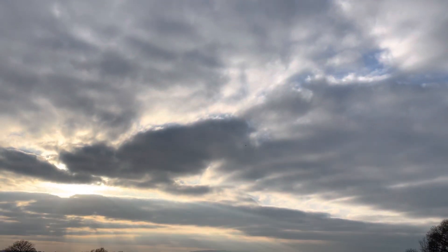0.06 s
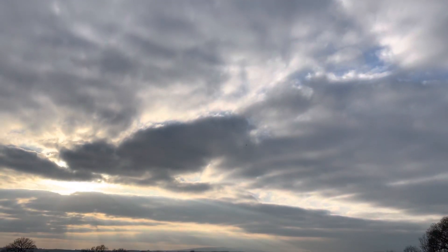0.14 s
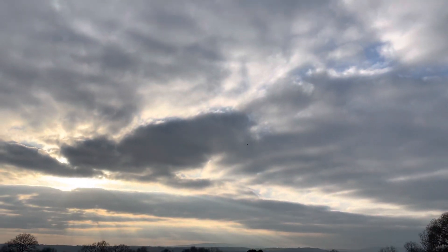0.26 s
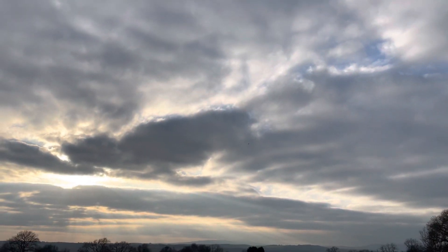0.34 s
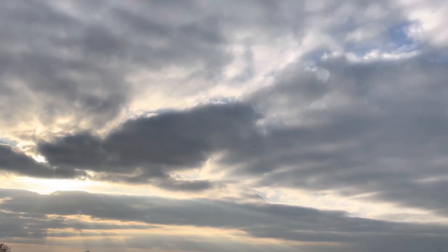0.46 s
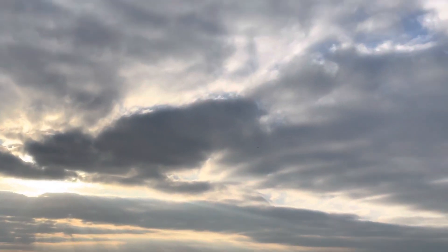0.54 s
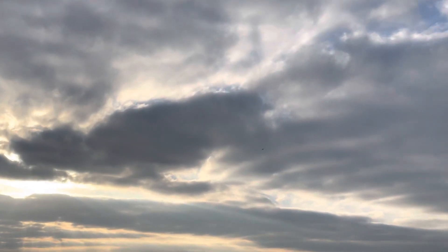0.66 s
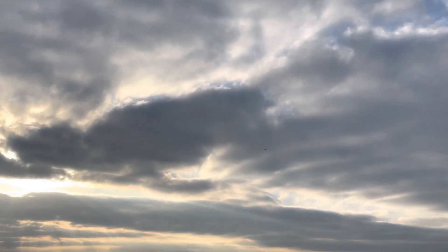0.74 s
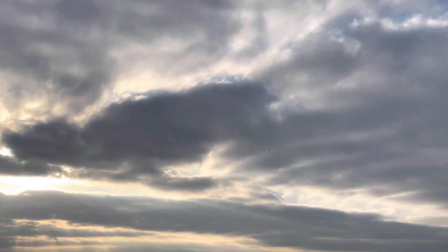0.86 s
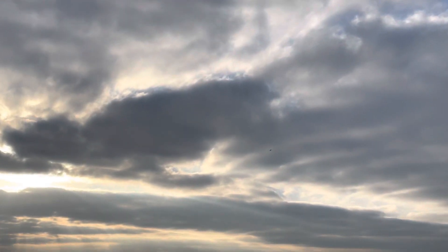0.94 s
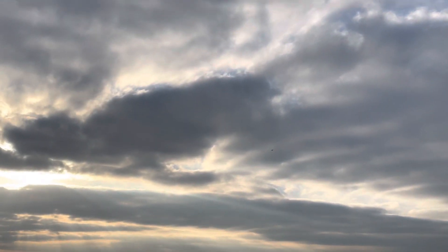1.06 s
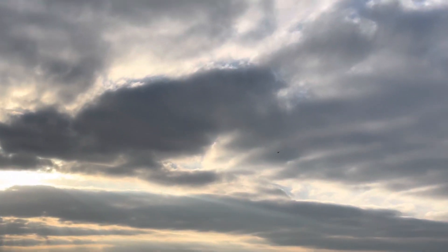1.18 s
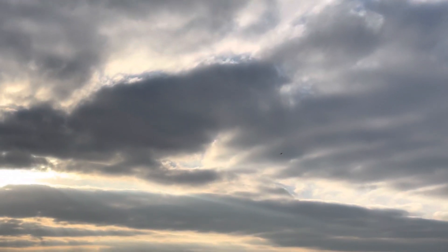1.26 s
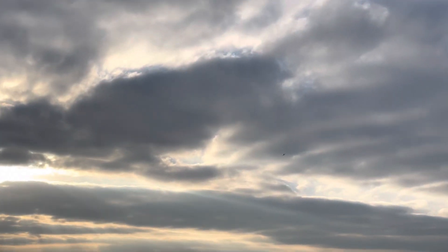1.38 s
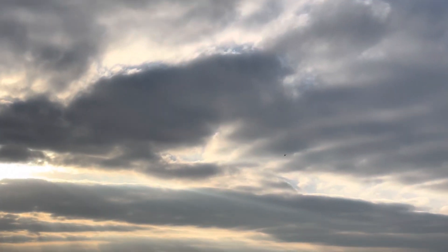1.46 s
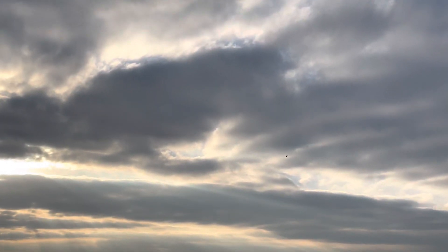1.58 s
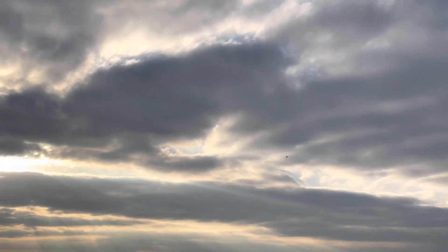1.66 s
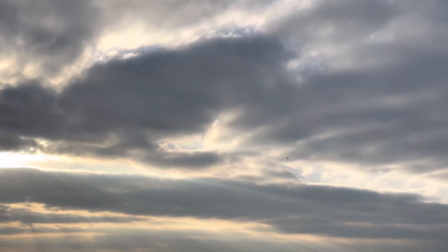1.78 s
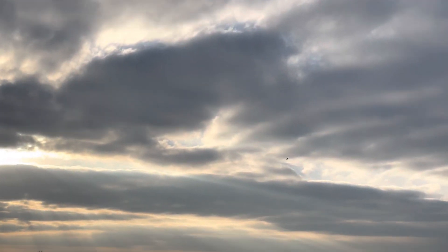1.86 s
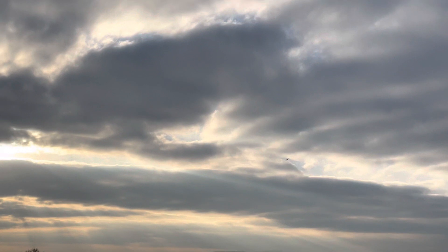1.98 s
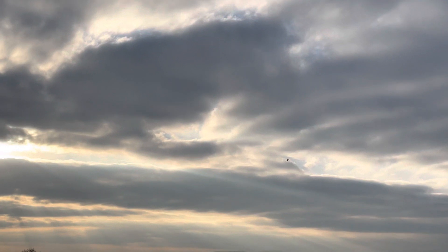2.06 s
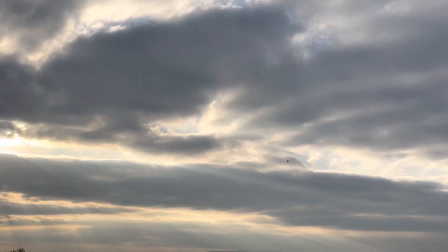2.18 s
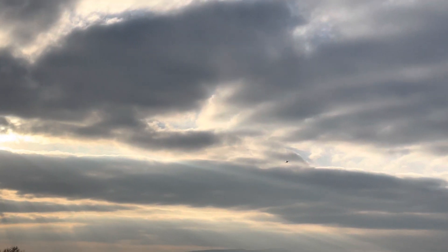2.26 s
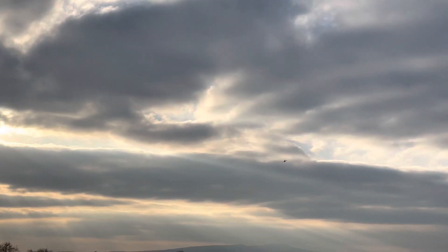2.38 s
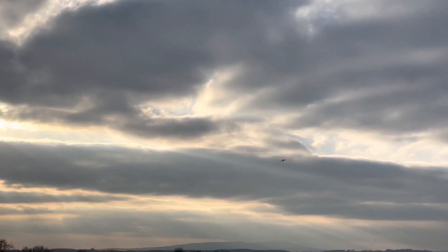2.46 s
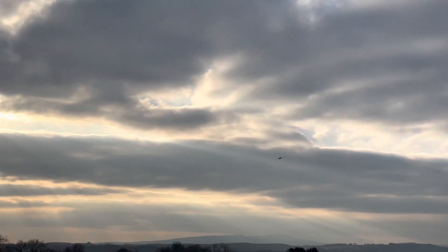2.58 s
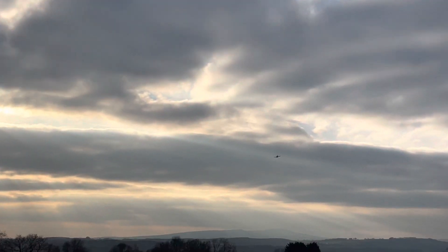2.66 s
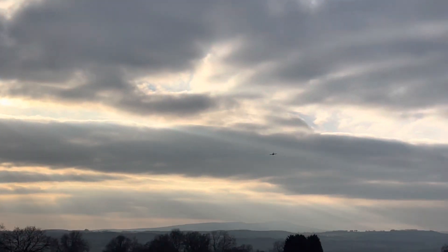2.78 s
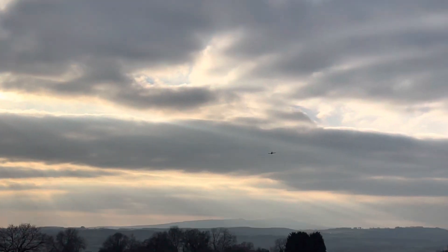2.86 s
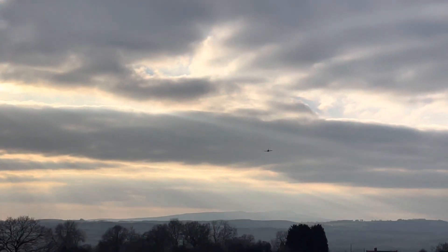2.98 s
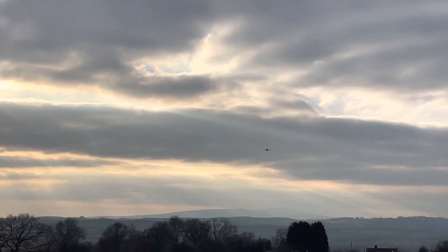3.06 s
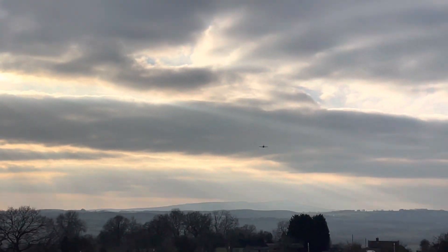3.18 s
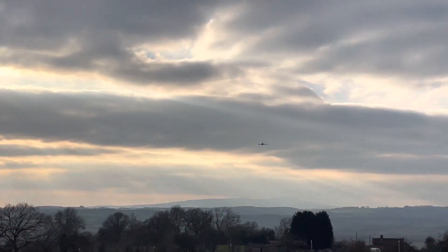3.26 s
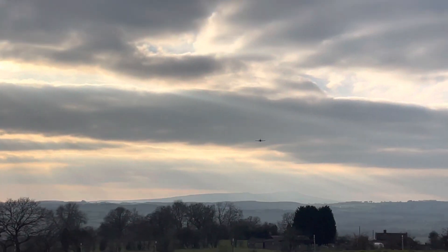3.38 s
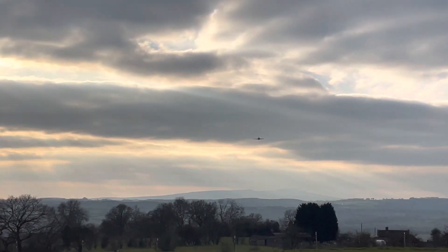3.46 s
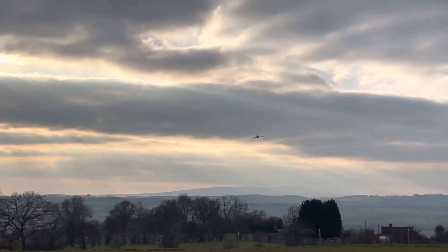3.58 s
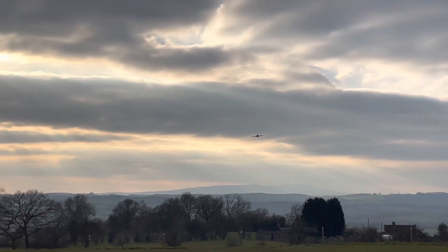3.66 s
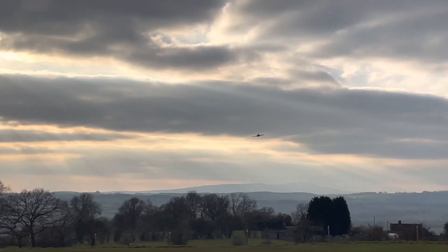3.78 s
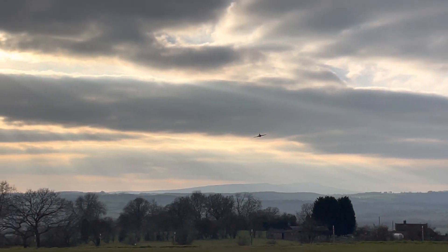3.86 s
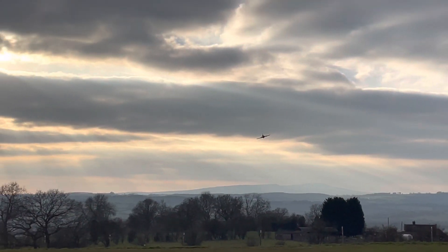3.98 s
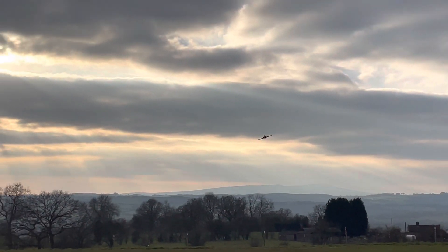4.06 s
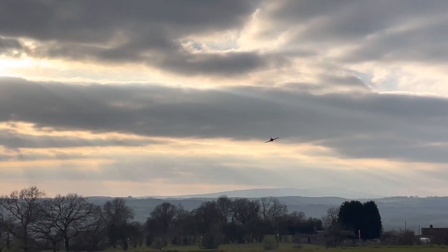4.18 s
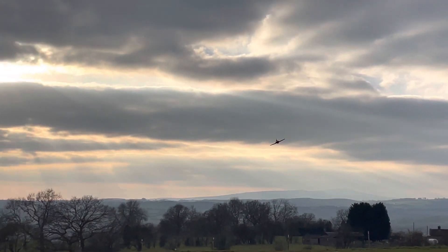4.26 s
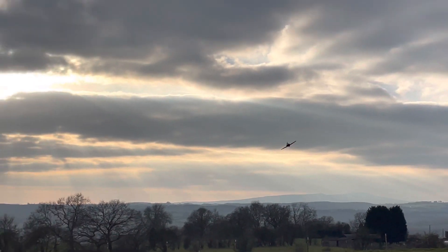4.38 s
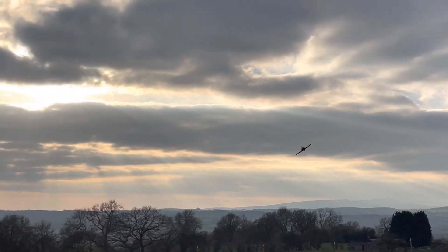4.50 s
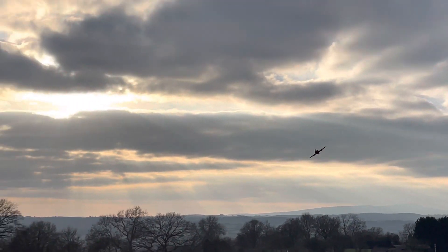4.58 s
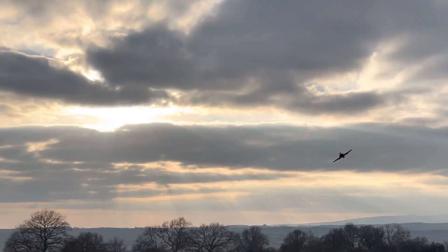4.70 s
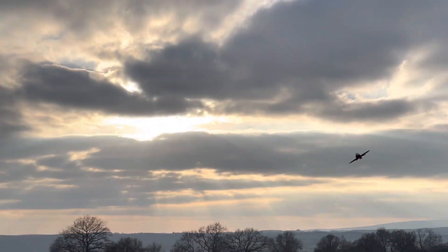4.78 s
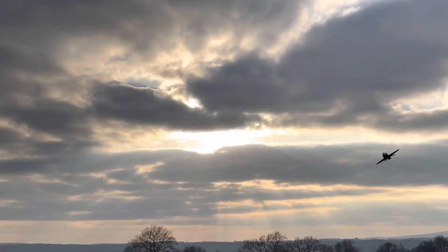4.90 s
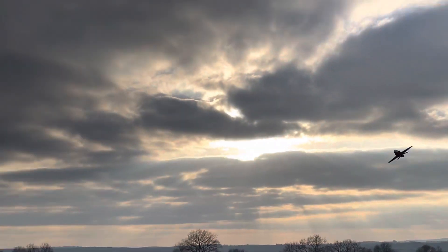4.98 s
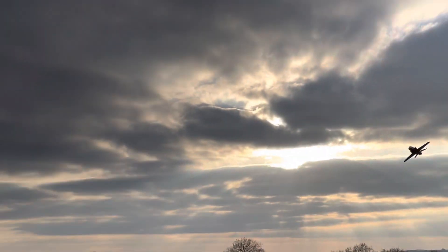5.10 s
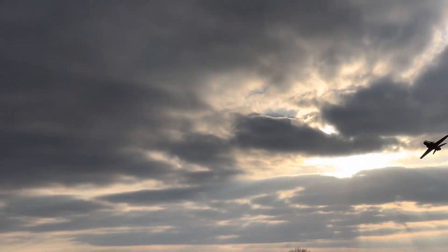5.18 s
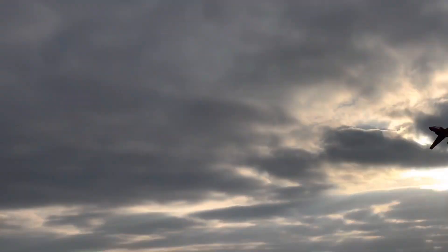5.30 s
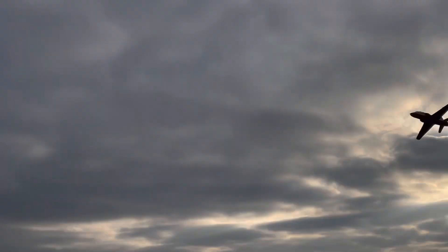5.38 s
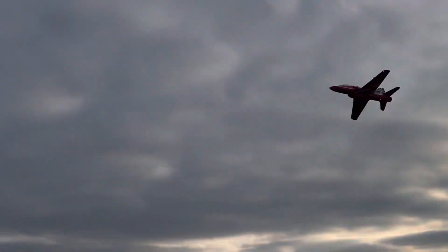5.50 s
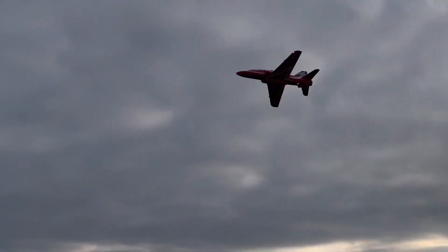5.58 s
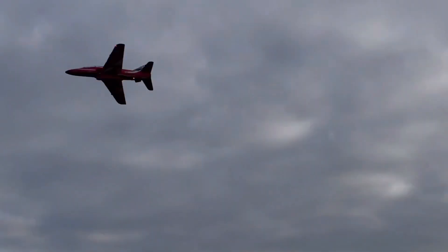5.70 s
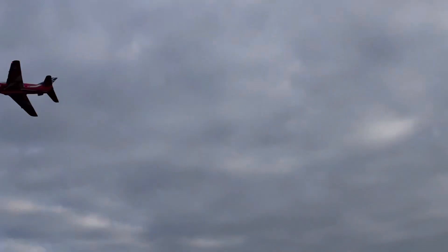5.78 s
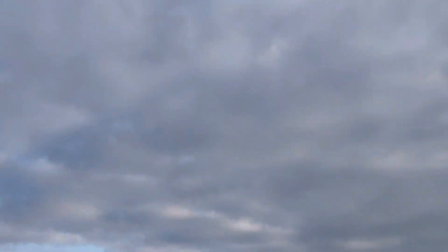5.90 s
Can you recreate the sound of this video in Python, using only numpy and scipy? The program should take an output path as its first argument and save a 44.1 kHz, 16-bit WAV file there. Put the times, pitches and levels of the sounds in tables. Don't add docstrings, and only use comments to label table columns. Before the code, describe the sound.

In a quiet open grass field, a handheld stereo microphone picks up a distant electric ducted-fan model jet. At first it is a thin, wavering whine and faint hiss, with soft wind rumble and tiny low pops on the microphone. Around 1 second the throttle opens and the whine jumps up in pitch, then holds nearly steady, shimmering as moving air brightens and dulls it. From 2 to 4 seconds the hiss gradually gains body, a hollow comb-like colour sliding through it from the grass reflection, while gusts thud lightly. From about 4.5 seconds it grows quickly into a broad, rushing roar with bright airy highs. At about 5.5 seconds it sweeps close past, its whine dropping in pitch, a low shaft hum surfacing briefly. At 5.6 seconds its wake hits the microphone with a heavy flutter and rumble, easing as the stretch ends, the jet still loud.

```python
import sys
import numpy as np
from scipy import signal
from scipy.fft import rfft, irfft, next_fast_len
from scipy.io import wavfile
from scipy.ndimage import uniform_filter1d, map_coordinates

SR = 44100
rng = np.random.default_rng(int(sys.argv[2]) if len(sys.argv) > 2 else 0)


def ratio_of_db(decibels):
    return 10 ** (np.asarray(decibels, float) / 20)


def file_out(sig):
    cols = np.atleast_2d(sig).T
    lim = np.clip(cols, -1, 1)
    pcm = np.round(lim * 32767).astype(np.int16)
    wavfile.write(sys.argv[1], SR, pcm)


N = 261777
T = np.arange(N) / SR
SIZE = next_fast_len(N)
HZ = np.maximum(np.arange(SIZE // 2 + 1) * SR / SIZE, 1)

# (time [s], distance [m], fan power towards the listener at 10 m [dB])
FLIGHT = [(0, 400, -46), (.22, 370, -34.5), (.6, 390, -32), (1.0, 207, -35.5), (1.3, 218, -31.5),
          (1.9, 132, -37.5), (2.3, 203, -28), (2.7, 96, -35.5), (3.05, 87, -40), (3.3, 103, -35),
          (3.5, 49.8, -38.5), (4.0, 27.9, -43.5), (4.6, 24.2, -37.5), (5.0, 21.8, -33.5), (5.3, 15.4, -32),
          (5.55, 10.9, -31), (5.72, 10.7, -32.5), (5.94, 8.1, -38.5)]
POCKET_ROAR, POCKET_MID, POCKET_TOP = 0.06, 0.41, 0.4
BLADES = 12


def rms_one(x):
    return x / np.sqrt(np.mean(x ** 2) + 1e-30)


def in_time(rows):
    s, *columns = np.transpose(rows)
    return [np.interp(T, s, c) for c in columns]


def on_grid(points):
    hz, value = np.transpose(points)
    return np.interp(np.log(HZ), np.log(hz), value)


def shaped(x, gain):
    return irfft(rfft(x, SIZE) * gain, SIZE)[..., :N]


def drift(rate_hz):
    r = np.exp(-2 * np.pi * rate_hz / SR)
    return rms_one(signal.lfilter([1], [1, -2 * r, r * r], rng.standard_normal(N + SR))[SR:])


def rising(at_s, span_s):
    return 1 / (1 + np.exp((at_s - T) / span_s))


def wavering(turn, width_hz):
    return drift(width_hz) * np.sin(turn) + drift(width_hz) * np.cos(turn)


def evened(x, window_s):
    power = uniform_filter1d(x ** 2, size=int(window_s * SR))
    return rms_one(x / np.sqrt(power + 1e-9) ** .65)


def heard(hz, pocket_share):
    # (time [s], gain at 5 kHz [dB], half length [s])
    pockets = [(0.425, 17, 0.15), (1.3, 7, 0.38), (1.537, 3.5, 0.051), (1.794, 3, .07), (2.05, 5.5, 0.087),
               (2.207, 5, 0.094), (2.509, 12, 0.13), (2.778, 2, 0.034), (3.052, 10, 0.24),
               (3.485, 4, 0.049), (3.6, 4, .06), (3.942, 1.5, 0.1), (4.08, 5, 0.13), (4.67, 4, 0.13),
               (4.946, 3, 0.036), (5.115, 3.5, 0.025), (5.45, 1, 0.041)]
    metres, power_db = in_time(FLIGHT)
    t = np.arange(0, N + 64, 64) / SR
    coarse_db = sum(db * np.exp(-((t - s) / half) ** 2) for s, db, half in pockets)
    pockets_db = np.interp(T, t, coarse_db)
    spreading_db = 20 * np.log10(metres / 10)
    air_db = 0.4423 * (hz / 11170.0) ** 2.02 * metres
    return power_db - spreading_db - air_db + pocket_share * pockets_db


def hiss():
    # (frequency [Hz], density [dB per Hz])
    hiss_colour = [(90, -12), (200, -13), (320, -1.5), (520, -1), (900, 3.5), (1760, 1), (1880, -8),
                   (2600, -10), (3600, -8.5), (5200, -17.5), (6500, -13.5), (8000, -12), (10000, -16),
                   (12500, -25.5), (14200, -25), (15800, -30)]
    # (low edge [Hz], high edge [Hz])
    ranges_hz = [(520, 1800), (1900, 3600), (3600, 6500), (9300, 12000)]
    colour = ratio_of_db(on_grid(hiss_colour))
    white = rfft(rng.standard_normal((2, SIZE))) * colour
    power = [2 / SIZE * np.sum(colour[(HZ > low) & (HZ < high)] ** 2) for low, high in ranges_hz]

    idle_db = -15 * (1 - rising(1, 0.099))
    shade_db = -1.5 * rising(4.6, 0.31)
    levels = [heard(1000, POCKET_ROAR),
              -6 + heard(2930, POCKET_MID),
              -4 + shade_db + idle_db + heard(3670, 1),
              -4 + heard(10500, POCKET_TOP)]
    roar, mid, blade, top = np.array(levels) - 10 * np.log10(power)[:, None]
    top = top + 0.067 * (top - top.max())
    shoulder = blade + 1.5 + heard(9700, .9) - heard(5300, 0.83)
    edge = top + 0.23 * (top - blade) + 0.21 * (top - top.max())
    exhaust = roar + 0.32 * (roar - np.median(roar))

    knots_hz = np.array([330, 560, 1720, 1950, 3900, 5300, 7700, 10500, 14000])
    gains_db = [exhaust, roar, roar, mid, mid, blade, shoulder, top, edge]
    path = np.sqrt(np.minimum(in_time(FLIGHT)[0] / 60, 1))
    air, out = drift(3.7), 0
    for k, gain_db in enumerate(gains_db):
        part = np.interp(HZ, knots_hz, np.arange(len(knots_hz)) == k)
        shimmer_db = path * (0.23 + 0.14 * k) * (1.67 * air + 2.7 * drift(2.7))
        out = out + ratio_of_db(gain_db + shimmer_db - 2.5) * irfft(white * part, SIZE)[:, :N]
    return out


def rotor():
    # (time [s], shaft [Hz],
    # unbalance shake over the roar [dB], blade whine over the hiss [dB])
    rotor_course = [(0, 352, -30, -20), (.4, 366, -3, 8), (.87, 372, -4.5, 9), (.95, 386, -3, 4),
                    (1.05, 435.6, -18, 9), (1.15, 448.9, -14, 10), (2.0, 454, -11, 9.5),
                    (2.5, 457, -20.5, 5), (4.5, 454.5, -11, -4), (4.9, 450.5, -9.5, -5.5),
                    (5.1, 447, -4.5, 0), (5.3, 439.8, -6, 4.5), (5.48, 431, -1.5, 1), (5.6, 423, 11, -2),
                    (5.68, 407.5, 6, 0.5), (5.78, 395.4, -4.5, 2), (5.86, 384.6, -5.5, 4.5),
                    (5.94, 382, -13, 2)]
    shaft_hz, shake_db, whine_db = in_time(rotor_course)
    roar_db = heard(1000, POCKET_ROAR)
    band_db = heard(BLADES * shaft_hz, 0.63)
    fade_db = roar_db - roar_db.max()

    first_db = roar_db + shake_db
    abeam_db = 5.5 * np.exp(-((T - 5.42) / 0.11) ** 2)
    twice_db = roar_db - 15.5 + 0.25 * fade_db + abeam_db
    third_db = roar_db - 18.5 - 0.11 * fade_db
    blade_db = band_db - 2 + whine_db + 2.7 * drift(4.1)
    broad_db = band_db - 0.5 + 0.2 * whine_db
    second_db = heard(9300, POCKET_TOP) - 10 + 13.5 * rising(5.71, 0.1)
    third_blade_db = second_db - 14 + heard(36 * shaft_hz, 0) - heard(24 * shaft_hz, 0)

    far = in_time(FLIGHT)[0] / 150
    near_far = np.minimum(far, 1)
    turn = 2 * np.pi * np.cumsum(shaft_hz * (1 + 0.001128 * drift(10.74))) / SR
    blade_turn = BLADES * turn
    tones = ratio_of_db(first_db + 3 + (1.6 + 2.5 * near_far) * drift(25.0)) * np.sin(turn)
    tones += ratio_of_db(twice_db + 4.5) * wavering(2 * turn, 10.0)
    tones += ratio_of_db(third_db + 1.5 + 2.26 * drift(15.0)) * np.sin(3 * turn)
    second = 1.3 * np.sin(2 * blade_turn) + .6 * wavering(2 * blade_turn, 30.)
    tones += ratio_of_db(second_db - 6 + 1.5 * drift(5.0)) * second
    tones += ratio_of_db(third_blade_db) * wavering(3 * blade_turn, 45.)
    tones += ratio_of_db(blade_db - 4.5 - 9 * np.minimum(far, 1.2)) * wavering(blade_turn, 70.)
    humps = ratio_of_db(blade_db - 7 - 3 * near_far) * wavering(blade_turn, 260.)
    humps += ratio_of_db(broad_db - 2) * wavering(12.3 * turn, 1030.0)
    return tones, humps


def ground(x):
    # (time [s], lag behind the direct sound [ms])
    bounce_lag = [(0, 3.8), (.4, 3.03), (.9, 2.97), (1.45, 2.51), (1.8, 2.29), (2.35, 1.78), (2.7, 1.51),
                  (3.55, 1.185), (3.9, 1.15), (4.3, 1.225), (4.7, 1.414), (4.9, 1.77), (5.1, 2.2),
                  (5.3, 2.67), (5.5, 4.7), (5.6, 5.74), (5.8, 5.56), (5.94, 3.8)]
    # (time [s], lows [0-1], highs [0-1])
    mirror = [
        (0, .7, .6),
        (2.5, .7, .55),
        (3.5, .85, .8),
        (4.4, .8, .75),
        (4.8, .9, .5),
        (5.2, .97, .3),
        (5.45, .7, .15),
        (5.94, .55, .15),
    ]
    lag_ms, = in_time(bounce_lag)
    low_share, high_share = np.clip(in_time(mirror), 0, 1)
    soil = np.exp(-.5j) / (1 + 1j * HZ / 30000.) / np.sqrt(1 + (HZ / 13000.) ** 2)
    lows = 1 / (1 + (HZ / 1900.) ** 4)
    bounce = low_share * shaped(x, soil * lows) + high_share * shaped(x, soil * (1 - lows))
    late = np.arange(N) - lag_ms * (1 + 0.0039 * drift(20.0)) * SR / 1000
    return x + np.array([map_coordinates(c, [late], order=3) for c in bounce])


def gusts():
    # (time [s], rumble [dB], rustle [dB], half length [s])
    gust_list = [(0.005, -33, -47.5, 0.016), (0.126, -38.5, -66, 0.046), (0.213, -33, -47.5, 0.021),
                 (0.411, -36, -45, 0.017), (.5, -45.5, -60, 0.15), (0.696, -41.5, -73, 0.042),
                 (1.027, -47.5, -59, 0.067), (1.624, -43.5, -55, 0.12), (1.785, -41.5, -89, 0.062),
                 (2.05, -46.5, -80, 0.082), (2.322, -36.5, -51, 0.041), (2.394, -32, -39.5, 0.013),
                 (2.45, -32, -56, 0.021), (2.568, -47, -50, 0.027), (2.753, -46, -59, .06),
                 (2.932, -40.5, -52, 0.059), (3.084, -32, -62, 0.031), (3.221, -39.5, -51, 0.037),
                 (3.443, -43, -55, 0.022), (3.604, -36.5, -67, 0.018), (3.772, -40, -54.5, 0.09),
                 (4.078, -33, -46.5, 0.037), (4.163, -33.5, -53, 0.033), (4.244, -33.5, -41.5, 0.022),
                 (4.374, -40, -45.5, 0.074), (4.55, -45, -47.5, 0.13), (4.768, -42.5, -44, 0.067),
                 (4.843, -35, -48, 0.038), (4.96, -28.5, -37, 0.0075), (5.049, -35, -53, 0.049)]
    # (time [s], rumble [dB], rustle [dB], half length [s])
    wake = [
        (5.557, -39, -43, 0.053),
        (5.618, -17.5, -18.5, 0.021),
        (5.652, -25, -21, 0.02),
        (5.703, -25, -34, 0.026),
        (5.77, -30.5, -27, 0.043),
        (5.84, -37.5, -44, 0.046),
    ]
    power = ratio_of_db(2 * np.array([[-51.5], [-60.5]]))
    for s, rumble_db, rustle_db, half in gust_list + wake:
        shape = np.cosh(np.clip(1.53 * (T - s) / half, -30, 30)) ** -2
        power = power + ratio_of_db(2 * np.array([[rumble_db], [rustle_db]])) * shape
    return 10 * np.log10(power)


def wind():
    # (frequency [Hz], density [dB per Hz])
    wind_colour = [(13, -36), (22, -15.5), (44, -1), (70, 2), (169, -12.5), (316, -22.5), (447, -24),
                   (487, -30), (700, -40), (910, -50), (1540, -120)]
    rumble_db, rustle_db = gusts()
    noise = rms_one(shaped(rng.standard_normal(N), ratio_of_db(on_grid(wind_colour))))
    low = shaped(noise, 1 / (1 + (HZ / 135.5) ** 6))
    rumble = ratio_of_db(rumble_db - 2.36 + 1.3 * drift(34.0)) * evened(low, 0.11)
    rustle = ratio_of_db(rustle_db - 2.5 + 3.2 * drift(33.5)) * evened(noise - low, 0.11)
    low_cut = signal.butter(4, 41., "high", fs=SR, output="sos")
    return signal.sosfilt(low_cut, rumble + rustle)


def pops():
    # (time [s], peak [dB], pitch [Hz])
    eddies = [(0.069, -42, 301), (0.293, -40, 398), (0.548, -37, 373), (0.655, -38, 347), (0.993, -38, 456),
              (1.805, -39, 326), (1.905, -41, 450), (1.952, -38, 313), (2.536, -29.5, 306),
              (2.64, -46, 450), (2.703, -39, 634), (2.88, -33, 462), (3.161, -33.5, 340), (3.201, -42, 746),
              (3.316, -38, 660), (3.405, -34.5, 720), (3.78, -35, 766), (3.887, -47, 890),
              (3.999, -36.5, 657), (4.06, -38, 840), (4.263, -32, 635), (4.531, -24.5, 604),
              (4.691, -44, 456), (4.773, -25, 426)]
    out, t = np.zeros(N), np.arange(SR // 40) / SR
    shape = np.exp(-((t - .0035) / 0.0011) ** 2)
    for s, peak_db, hz in eddies:
        at = round(s * SR)
        cycle = np.sin(2 * np.pi * hz * t * (1.4 - 60. * t))
        out[at:at + len(t)] += ratio_of_db(peak_db - 4.0) * shape * cycle
    return out


def open_field():
    # (frequency [Hz], density [dB per Hz])
    field_colour = [(150, -0.5), (500, 2.5), (1000, -3.5), (2000, -11.5), (4000, -27.5), (6000, -53),
                    (11500, -39), (13500, -71)]
    noise = shaped(rng.standard_normal((2, N)), ratio_of_db(on_grid(field_colour)))
    return ratio_of_db(-64) * rms_one(noise)


def ports(common, unalike):
    # (frequency [Hz], level under the common part [dB])
    width = [(150, -45.5), (330, -37.5), (520, -18), (1000, -12.5), (1500, -13.5), (1850, 2.5), (2150, -20),
             (2500, -19), (3300, -36.5), (4500, -35), (6000, -70), (6500, -12.5), (10400, -4.5),
             (11200, -40), (12200, -45), (13000, -32), (14100, -30), (14300, -72)]
    # (frequency [Hz], lead of the right channel
    channel_turn = [(5950, 0), (6250, .5), (7060, 1.5), (7750, 2.9), (8800, 3.42), (10300, 5.0), (11100, 6.2),
                    (12200, 6.4), (12900, 7.7), (13600, 8.5), (14200, 9.42)]
    unalike = shaped(unalike, ratio_of_db(on_grid(width)))
    turn = np.exp(.5j * on_grid(channel_turn))
    return np.array([shaped(common, 1 / turn) + unalike, shaped(common, turn) - unalike])


def scene():
    tones, humps = rotor()
    common, unalike = ground(hiss() + (humps + tones) * [[1], [0]])
    field = open_field()
    common = common + pops() + wind() + field[0]
    unalike = 0.43 * unalike + 0.64 * shaped(common, 1j) + ratio_of_db(8.5) * field[1]
    return ports(common, unalike)


def top_cut(x):
    return signal.sosfilt(signal.butter(12, 15800, fs=SR, output="sos"), x)


def record(dry):
    return top_cut(dry)


dry = scene()
out = record(dry)
file_out(out)
```